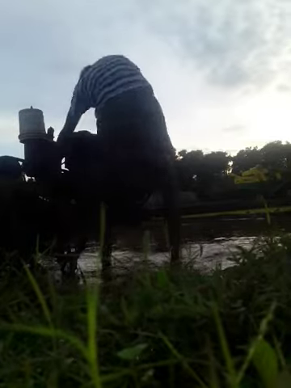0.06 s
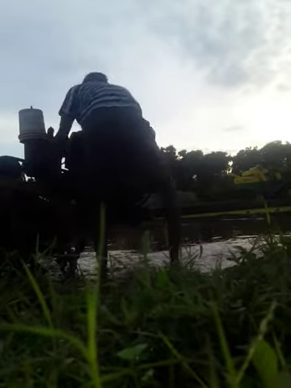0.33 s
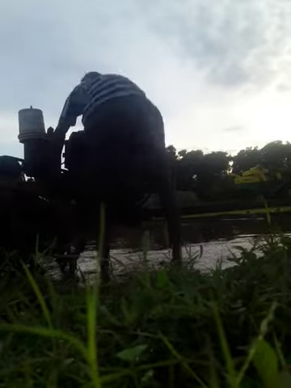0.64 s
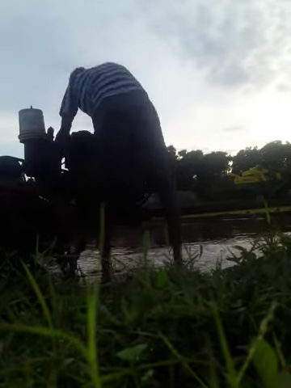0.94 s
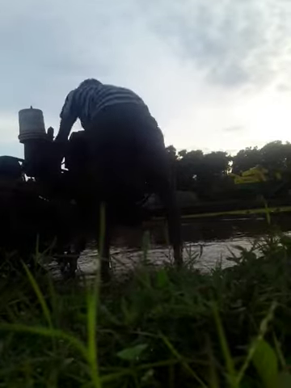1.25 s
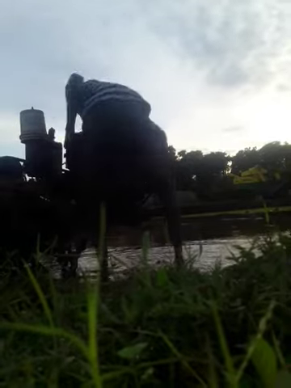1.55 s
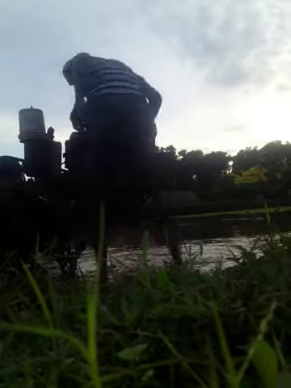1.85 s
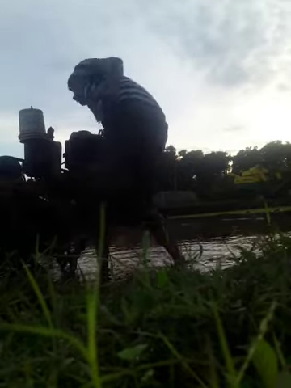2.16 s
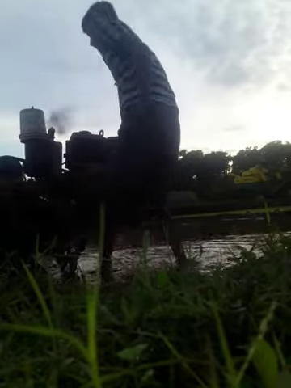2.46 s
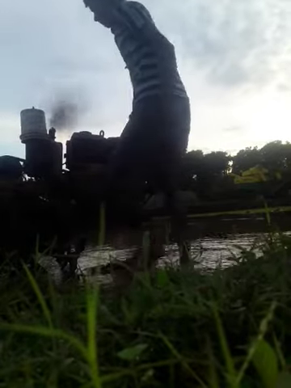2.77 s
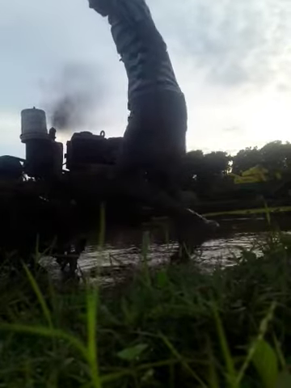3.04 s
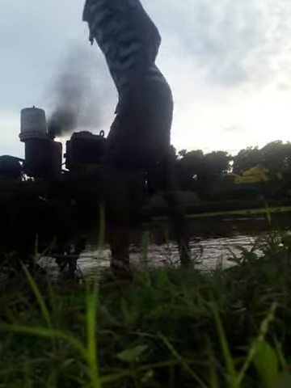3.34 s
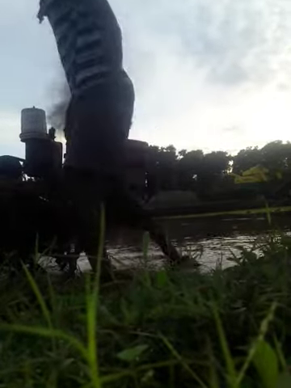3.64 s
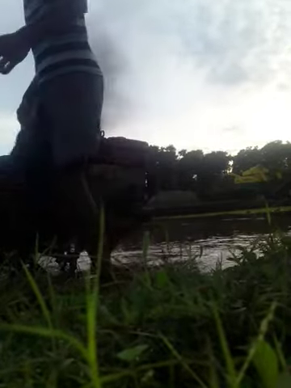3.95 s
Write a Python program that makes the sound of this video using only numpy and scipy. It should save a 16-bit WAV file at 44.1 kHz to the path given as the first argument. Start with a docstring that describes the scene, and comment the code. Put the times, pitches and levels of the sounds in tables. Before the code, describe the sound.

A single-cylinder diesel engine is hand-cranked close by outdoors, gears churning, the handle clinking and valves clacking. At about 1.7 seconds metal scrapes and the intake gives a hollow gulp. The engine fires at about 2 seconds, then grows louder and faster, each beat a clattering knock with an exhaust chuff. From 3 seconds to the end at 4, loose metal chatters and a panel hums.

```python
"""A single-cylinder diesel engine, started by hand in the open air, close to one microphone.
Under the crank the gears churn and ring the casing, the handle clinks and the valve gear clacks.
Compression comes in with a scrape; the engine gulps air, fires at about 2 s and gathers speed.
From then on each cycle is a clattering knock that sets a loose panel humming, an exhaust chuff
through the silencer and a hollow intake gulp, with valves tapping and loose metal chattering."""
import sys
import numpy as np
from scipy import signal
from scipy.fft import rfft, irfft
from scipy.io import wavfile
from scipy.ndimage import map_coordinates

SR = 44100
rng = np.random.default_rng(int(sys.argv[2]) if len(sys.argv) > 2 else 0)


def persist_wave(psi):
    """Save psi, clipped to +-1, as 16-bit WAV."""
    counts = np.round(np.clip(psi, -1, 1) * 32767).astype(np.int16)
    wavfile.write(sys.argv[1], SR, np.atleast_2d(counts).T)


N = 176400  # 4 s


def amp(db):
    """Decibels to gain."""
    return 10 ** (np.asarray(db) / 20)


def unit(x):
    """Scale to rms 1."""
    return x / np.sqrt(np.mean(x ** 2) + 1e-20)


def curve(rows):
    """One value per sample from (time [s], value) rows."""
    return np.interp(np.arange(N) / SR, *np.transpose(rows))


def wobble(rate):
    """A smooth random curve, rate knots a second."""
    knots = rng.standard_normal(int(N * rate / SR) + 4)
    return map_coordinates(knots, [np.arange(N) * rate / SR])


def coloured(x, spectrum):
    """x shaped by (frequency [Hz], level [dB]) points, at rms 1."""
    points_hz, db = np.transpose(spectrum)
    hz = np.fft.rfftfreq(2 * N, 1 / SR)
    gain = amp(np.interp(np.log(hz + 1), np.log(points_hz), db))
    return unit(irfft(rfft(x, 2 * N) * gain)[:N])


def noise(spectrum):
    """Coloured noise of rms 1."""
    return coloured(rng.standard_normal(N), spectrum)


def impacts(rate, bed):
    """Random small contacts, rate a second, on noise that is bed times as strong; rms 1."""
    contacts = (rng.random(N) < rate / SR) * rng.uniform(-1.15, 1, N)
    return unit(unit(contacts) + bed * rng.standard_normal(N))


def burst(start, attack, hold, t60):
    """Envelope that rises at start and dies away from start + hold; all in seconds."""
    t = np.arange(N) / SR - start
    return np.clip(t / attack, 0, 1) * amp(-60 * np.clip((t - hold) / t60, 0, 2))


def ring(modes):
    """Half a second of a struck body: each mode is a decaying sine."""
    t = np.arange(SR // 2) / SR
    return sum(amp(db - 60 * t / t60) * np.sin(2 * np.pi * hz * t) for hz, db, t60 in modes)


def soft_ring(modes, rise_s):
    """A struck body whose ringing takes a moment to build."""
    t = np.arange(SR // 2) / SR
    return ring(modes) * (1 - np.exp(-t / rise_s))


def pop(hz, peak_s, rise=0.1, rise_s=0.019):
    """A slug of air rings a pipe for a few cycles, its pitch climbing by the share rise."""
    t = np.arange(SR // 10) / SR
    pitch = hz * (1 + rise * np.minimum(t / rise_s, 1))
    envelope = (t / peak_s * np.exp(1 - t / peak_s)) ** 3
    return envelope * np.sin(2 * np.pi * np.cumsum(pitch) / SR)


def add(track, start, sound):
    """Mix a sound in at start seconds."""
    part = track[max(round(start * SR), 0):][:len(sound)]
    part += sound[:len(part)]


# modes of the casing and tank (frequency [Hz], level [dB], t60 [s])
CASING_MODES = [(187.4, -11, 0.13), (303.5, -1, 0.17), (343, -2.5, 0.38), (400.6, 2, 0.089),
                (487.3, 1.5, 0.11), (538.7, -3.5, 0.29), (603, -3.5, 0.15), (706.3, 0, .15),
                (751, -2.5, 0.12), (1099, -8, 0.13), (1260.6, -2.5, 0.28), (1398, -16, 0.3)]

def casing(rate):
    """The casing rung by small contacts, rate a second, at rms 1."""
    rung = signal.fftconvolve(impacts(rate, bed=1), ring(CASING_MODES))[:N]
    return coloured(rung, [(40, -36.5), (110, -7.5), (170, -1.5), (1500, 0), (2200, -19.5), (6000, -37)])


# the churn of the gears at the microphone (time [s], level [dB])
GEAR_LEVEL = [(0, -32.5), (.2, -32), (.35, -30.5), (.53, -31), (.66, -27.5), (.78, -32.5), (.88, -28.5),
              (1.0, -31), (1.12, -28), (1.25, -31.5), (1.33, -26.5), (1.44, -32), (1.53, -24.5),
              (1.63, -32), (1.75, -28), (1.84, -30.5), (1.95, -29), (2.15, -24), (2.3, -27.5), (2.45, -23),
              (2.62, -25.5), (2.8, -23), (3.1, -20.5), (3.5, -18.5), (3.7, -17.5), (4.0, -17.5)]
# the churn eases as the piston slows on compression (time after the chuff [cycles], level [dB])
COMPRESSION_SAG = [(0, 0.5), (.14, 1.5), (.22, 2), (.36, 3), (.46, -0.5), (.56, 1), (.73, 0.5), (.8, -2),
                   (1, 1)]
# the gears turned by hand, and under power (frequency [Hz], level [dB])
CRANKING_SPECTRUM = [(24, -63), (45, -43.5), (80, -19), (125, -14), (181, -9.5), (270, -11), (310, -14.5),
                     (341, 5.5), (375, -3.5), (469, -0.5), (559, -5.5), (611, -0.5), (763, 2), (930, -11),
                     (1060, -4), (1330, -6.5), (1450, -6), (1750, -18), (2100, -26), (2760, -24.5),
                     (3400, -32), (4700, -54.5), (8000, -75.5), (12000, -110)]
RUNNING_SPECTRUM = [(24, -61), (45, -43.5), (101, -16.5), (135, -16), (185, -1.5), (225, -10.5), (307, -4),
                    (341, 1.5), (370, -1), (405, 2), (572, -5.5), (730, -8), (932, -13), (1240, -4.5),
                    (1480, -7.5), (1810, -27.5), (2210, -36.5), (2420, -30.5), (2820, -26.5), (4020, -42.5),
                    (5600, -56.5), (8000, -77.5), (12000, -110)]

def gears():
    """Dense tooth contacts ring the casing; the sound fills out as the engine takes over."""
    chuff_times = np.transpose(EXHAUST_CHUFFS)[0]
    cycle = np.interp(np.arange(N) / SR, chuff_times, np.arange(len(chuff_times))) % 1
    sag_db = np.interp(cycle, *np.transpose(COMPRESSION_SAG))
    level = amp(curve(GEAR_LEVEL) + sag_db + 0.93 * wobble(rate=45))
    takeover = curve([(1.9, 0), (3.2, 0.95)])
    cranking = amp(-2) * coloured(impacts(rate=900, bed=1), CRANKING_SPECTRUM)
    running = amp(-0.5) * coloured(impacts(rate=2000, bed=0.87), RUNNING_SPECTRUM)
    ringing = amp(-6 + 2.63 * takeover) * casing(rate=700)
    return level * (np.sqrt(1 - takeover) * cranking + np.sqrt(takeover) * running + ringing)


# the background of the place, high and low (frequency [Hz], level [dB])
HISS_SPECTRUM = [(4000, -39), (7500, -12), (9500, 3), (15500, 2)]
RUMBLE_SPECTRUM = [(25, -15), (55, -10.5), (88, 1.5), (125, -16.5), (400, -49.5)]

def background():
    """A faint steady hiss and a low rumble lie under the engine."""
    return amp(-65) * noise(HISS_SPECTRUM) + amp(-62) * noise(RUMBLE_SPECTRUM)


# the valve gear rattles under the crank (time [s], level [dB], t60 [s])
VALVE_RATTLES = [(0.056, -34, 0.29), (0.136, -22.5, 0.059), (0.173, -21.5, 0.094), (0.438, -24.5, 0.097),
                 (0.587, -23.5, 0.11), (0.676, -23, 0.15), (0.717, -37, 0.093), (0.8, -29, 0.063),
                 (0.911, -30, .06), (1.046, -28, 0.18), (1.135, -23, 0.19), (1.377, -27.5, 0.089),
                 (1.478, -25.5, .12), (1.56, -24, 0.17), (1.903, -24.5, 0.027)]
# colour of a rattle (frequency [Hz], level [dB])
RATTLE_SPECTRUM = [(60, -54.5), (180, -12.5), (400, 4), (750, 8), (950, -16.5), (1300, 15.5), (2000, -13.5),
                   (3200, -9.5), (4500, -34), (7000, -62), (10000, -47), (15500, -46)]
# the valves close under the crank (time [s], level [dB])
VALVE_THUDS = [(0.059, -26.5), (0.586, -23.5), (1.05, -26.5), (1.481, -23.5), (1.9, -24)]
# modes of a valve's thud (frequency [Hz], level [dB], t60 [s])
THUD_MODES = [(183, -2.5, 0.18), (285, 3, 0.066), (354, -11.5, 0.1)]

def cranked_valves():
    """Turned by hand, the valve gear rattles and the valves close with light knocks."""
    thuds = np.zeros(N)
    thud = soft_ring(THUD_MODES, rise_s=0.003)
    for start, db in VALVE_THUDS:
        add(thuds, start, amp(db) * thud)
    rattles = sum(amp(db) * burst(start, 0.0046, 0.0027, t60) for start, db, t60 in VALVE_RATTLES)
    return thuds + rattles * noise(RATTLE_SPECTRUM)


# the handle strikes its socket (time [s], level [dB], pitch [ratio to the free handle])
HANDLE_CLINKS = [(0.1666, -16, 0.85), (0.1718, -9, .93), (0.1767, -12.5, 0.62), (.1805, -14.5, 0.52),
                 (.441, -6, 0.98), (.68, -17.5, 0.96), (.686, -16, 0.57), (1.133, -11.5, 0.94),
                 (1.137, -13, 0.89), (1.319, -19, 0.41), (1.3765, -4.5, 0.96), (1.564, -13, 0.93),
                 (2.049, -15, 1), (2.058, -13.5, 0.85)]
# modes of the free handle (frequency [Hz], level [dB], t60 [s])
HANDLE_MODES = [(1300, 1, .021), (1258, -16, .075), (1420, -12, .012), (760, -19, .025), (2536, -29, .045),
                (3300, -20, .022), (3900, -29, .025)]
# the click of metal on metal (frequency [Hz], level [dB])
CONTACT_SPECTRUM = [(1000, -21.5), (3200, -0.5), (4200, -8.5), (5600, -22.5), (7000, -50)]

def crank_handle():
    """The handle clinks in its socket: a short ring and a click, stronger on the higher clinks."""
    rings, clicks = np.zeros(N), np.zeros(N)
    t = np.arange(SR // 2) / SR
    onset = 1 - np.exp(-(t / 0.0013) ** 2)
    for start, db, pitch in HANDLE_CLINKS:
        modes = np.array(HANDLE_MODES) * [pitch, 1, 1]
        add(rings, start, amp(db + 2.5) * ring(modes) * onset)
        clicks += amp(db - 35) * pitch ** 4 * burst(start, 0.001, 0.0017, 0.016)
    return rings + clicks * noise(CONTACT_SPECTRUM)


# sharp ticks of loose metal (time [s], level [dB])
METAL_TICKS = [(.583, -42.5), (1.046, -42), (1.478, -44), (1.684, -46), (1.777, -43.5), (1.897, -40.5),
               (2.076, -38), (3.161, -38.5), (3.192, -27), (3.405, -33), (3.595, -32), (3.755, -39.5)]
# colours of a tick and of the chatter (frequency [Hz], level [dB])
TICK_SPECTRUM = [(500, -8), (1300, 18), (2100, 5), (3000, 18.5), (5000, -11), (7500, -25.5), (10000, -10.5),
                 (13500, -6), (15300, 1.5)]
CHATTER_SPECTRUM = [(300, -27.5), (1300, 6.5), (2100, -4.5), (2800, 2.5), (4000, -13), (5500, -22),
                    (7500, -36), (10000, -20), (15500, -27)]

def loose_metal(hits_per_s=70):
    """Loose parts tick now and then, and their chatter comes up once the engine runs."""
    ticks = sum(amp(db) * burst(start, 0.0067, 0.0087, 0.029) for start, db in METAL_TICKS)
    hits = (rng.random(N) < hits_per_s / SR) * amp(1.83 * rng.standard_normal(N))
    hit_envelope = burst(0, 0.0012, 0.0015, 0.044)[:SR // 10]
    chatter = unit(signal.fftconvolve(hits, hit_envelope)[:N])
    level = amp(curve([(1.9, -61), (2.8, -48), (3.2, -37.5), (4, -39.5)]))
    return ticks * noise(TICK_SPECTRUM) + level * chatter * noise(CHATTER_SPECTRUM)


# two scrapes at the microphone (time [s], level [dB])
SCRAPE_LEVEL = [(1.655, -62), (1.685, -26), (1.71, -31.5), (1.75, -56.5), (1.8, -70.5), (2.02, -78),
                (2.065, -33), (2.085, -36.5), (2.12, -74)]
# colour of sliding metal (frequency [Hz], level [dB])
SCRAPE_SPECTRUM = [(100, -1), (800, 1), (1300, 13.5), (2000, -7), (3200, 0), (4200, -15.5), (5500, -34),
                   (7500, -46), (10000, -35), (15500, -32)]

def scrapes():
    """Metal scrapes as compression is let in, and again as the handle comes off."""
    return amp(curve(SCRAPE_LEVEL)) * coloured(impacts(rate=1500, bed=0.27), SCRAPE_SPECTRUM)


# gulps at the air cleaner (time [s], level [dB], starting pitch [Hz], time to the peak [s])
INTAKE_GULPS = [(1.789, -3.5, 247, 0.0051), (2.2017, -4.5, 245, 0.0037), (2.5347, -5, 250, 0.0042),
                (2.8168, -6, 257, .0024), (3.0667, -1, 277.6, 0.0019), (3.2871, -4, 258, 0.0026),
                (3.4857, -5, 287, 0.003), (3.671, -6, 287, 0.0037), (3.8428, -2, 268, 0.0018)]

def intake():
    """One hollow gulp through the air cleaner per cycle."""
    gulps = np.zeros(N)
    for start, db, hz, peak_s in INTAKE_GULPS:
        add(gulps, start, amp(db) * pop(hz, peak_s))
    return gulps


# the cylinder fires (time [s], clatter level [dB], hold [s], crack level [dB], panel level [dB])
CYLINDER_FIRINGS = [(2.043, -24.5, 0.012, -40.5, -44), (2.376, -17.5, 0.023, -38, -21),
                    (2.68, -16, 0.058, -29, -30), (2.944, -14, 0.062, -22.5, -28),
                    (3.176, -14, 0.041, -15, -32), (3.381, -14.5, 0.045, -26.5, -6.5),
                    (3.574, -16.5, 0.028, -22.5, -8), (3.752, -13.5, 0.031, -17.5, -22),
                    (3.923, -10.5, .022, -20, -19.5)]
# colours of the clatter and of the crack (frequency [Hz], level [dB])
CLATTER_SPECTRUM = [(60, -11), (170, -1), (330, 6.5), (560, 2), (760, 1.5), (950, -9.5), (1200, 2.5),
                    (1500, 0), (1750, -18), (2150, -23), (2700, -18.5), (3900, -32.5), (5000, -60.5),
                    (7000, -64.5), (10000, -46.5), (15500, -58)]
CRACK_SPECTRUM = [(200, -23), (800, -1), (1300, 5.5), (2100, -15.5), (2800, -4.5), (4000, -20), (5500, -32),
                  (7500, -50), (15500, -49.5)]

def knocks():
    """Each firing cracks and shakes the casing and loose metal into a burst of clatter."""
    shake, cracks = np.zeros(N), np.zeros(N)
    for start, clatter_db, hold, crack_db, _ in CYLINDER_FIRINGS:
        shake += amp(clatter_db) * burst(start, 0.0062, hold, 0.15)
        cracks += amp(crack_db) * burst(start + 0.0016, 0.0035, 0.003, 0.066)
    clatter = amp(-1.5) * coloured(impacts(rate=2000, bed=0.75), CLATTER_SPECTRUM)
    ringing = amp(-7) * casing(rate=1600)
    return shake * (clatter + ringing) + cracks * noise(CRACK_SPECTRUM)


# modes of a loose panel (frequency [Hz], level [dB], t60 [s])
PANEL_MODES = [(342.6, -1.5, .5), (405, -13.5, 0.37), (603, -26, .4)]

def panel():
    """Every firing sets a loose panel humming."""
    hums = np.zeros(N)
    hum = soft_ring(PANEL_MODES, rise_s=0.0086)
    for start, *_, panel_db in CYLINDER_FIRINGS:
        add(hums, start + rng.uniform(0, 0.0021), amp(panel_db) * hum)
    return hums


# the exhaust valve opens; gears and valves count their cycle from here (time [s], level [dB])
EXHAUST_CHUFFS = [(2.11, -10), (2.454, -8.5), (2.747, -7), (3.002, -5), (3.23, -3), (3.432, -2.5),
                  (3.621, -2), (3.796, -6.5), (3.959, -8.5)]
# modes of the silencer (frequency [Hz], level [dB], t60 [s])
SILENCER_MODES = [(69.4, -1.5, 0.3), (105.5, 3, 0.36), (175, -11.5, 0.12)]
# gas escaping into the open air (frequency [Hz], level [dB])
GAS_SPECTRUM = [(100, -25), (400, 8), (1400, 7), (2100, -7.5), (2900, -9), (4100, -14), (5200, -27),
                (7500, -42), (10000, -26), (15500, -25.5)]

def exhaust(blowdown_s=0.031):
    """A pop, a short hiss of gas and the low boom of the silencer while the valve is open."""
    chuffs, gas = np.zeros(N), np.zeros(N)
    boom = ring(SILENCER_MODES) * burst(0, 0.0012, blowdown_s, 0.013)[:SR // 2]
    for start, db in EXHAUST_CHUFFS:
        add(chuffs, start, -amp(db) * pop(hz=277, peak_s=0.0016))
        add(chuffs, start, amp(-24 + 0.2 * db) * boom)
        gas += amp(db - 15) * burst(start, 0.004, 0.0096, 0.04)
    return chuffs + gas * noise(GAS_SPECTRUM)


# valve taps in each cycle (time after the chuff [cycles], tick level [dB], thud level [dB])
VALVE_TAPS = [(.235, -7, -10.5), (.522, -9, -4.5), (0.786, -30, -7)]

def running_valves(tick_db_per_chuff_db=0.32):
    """The valves tick and seat at set angles of each cycle, louder after a strong chuff."""
    chuff_times = np.transpose(EXHAUST_CHUFFS)[0]
    ticks, thuds = np.zeros(N), np.zeros(N)
    thud = soft_ring(THUD_MODES, rise_s=0.0021)
    for (start, chuff_db), cycle_s in zip(EXHAUST_CHUFFS, np.diff(chuff_times)):
        for share, tick_db, thud_db in VALVE_TAPS:
            at = start + share * cycle_s
            tick_gain = amp(tick_db_per_chuff_db * chuff_db + tick_db - 26.5)
            ticks += tick_gain * burst(at, 0.002, 0.003, 0.035)
            add(thuds, at + 0.0024, amp(chuff_db + thud_db - 6.5) * thud)
    return ticks * noise(TICK_SPECTRUM) + thuds


def scene():
    """The whole engine from close by, outdoors: one channel, direct sound only."""
    machinery = gears() + background() + cranked_valves() + crank_handle() + loose_metal() + scrapes()
    cycles = intake() + knocks() + panel() + exhaust() + running_valves()
    return (machinery + cycles)[None]


def record(dry, low_cut_hz=51, ceiling=0.95, top_hz=15850):
    """Behind the microphone, the recorder cuts deep bass, rounds the peaks and limits the band."""
    low_cut = signal.butter(4, low_cut_hz, "high", fs=SR, output="sos")
    trimmed = signal.sosfilt(low_cut, dry)
    rounded = trimmed / (1 + np.abs(trimmed / ceiling) ** 8) ** (1 / 8)
    in_band = np.fft.rfftfreq(2 * N, 1 / SR) < top_hz
    return irfft(rfft(rounded, 2 * N) * in_band)[:, :N]


dry = scene()
out = record(dry)
persist_wave(out)
```